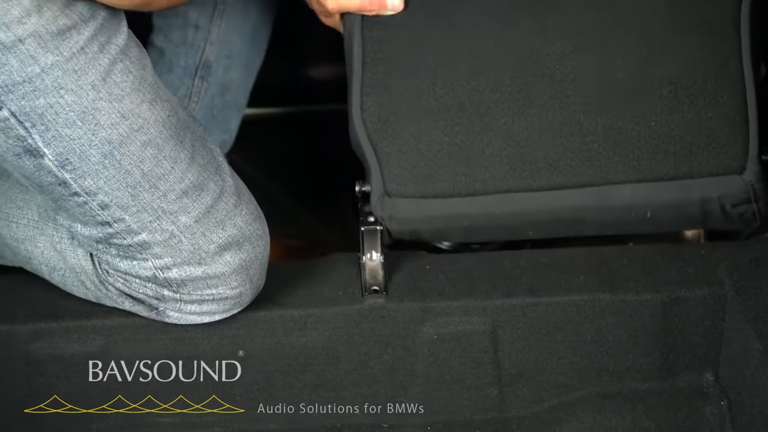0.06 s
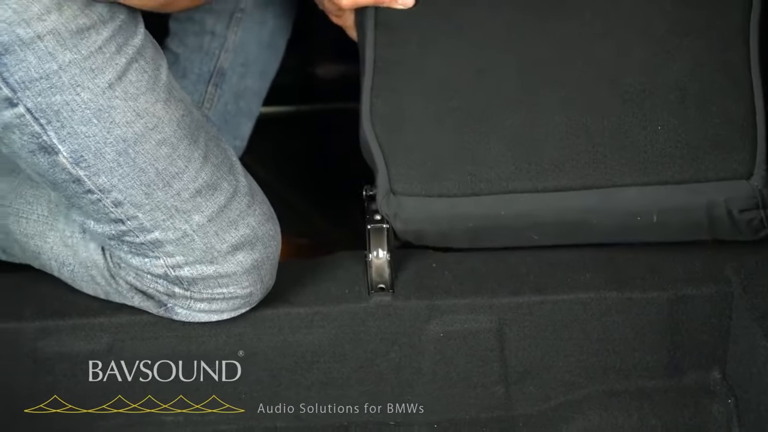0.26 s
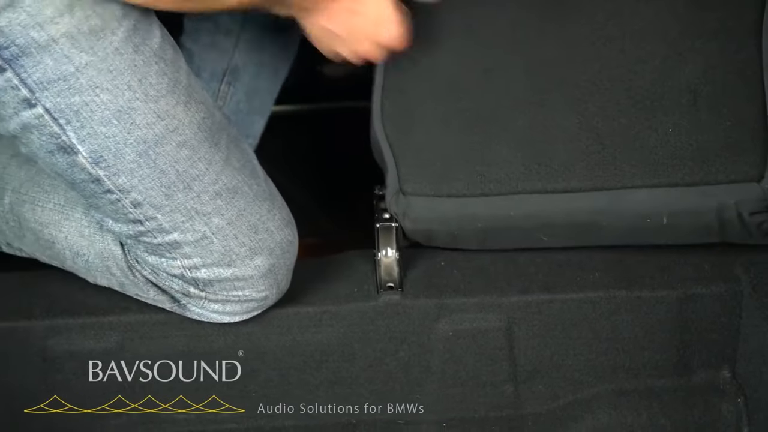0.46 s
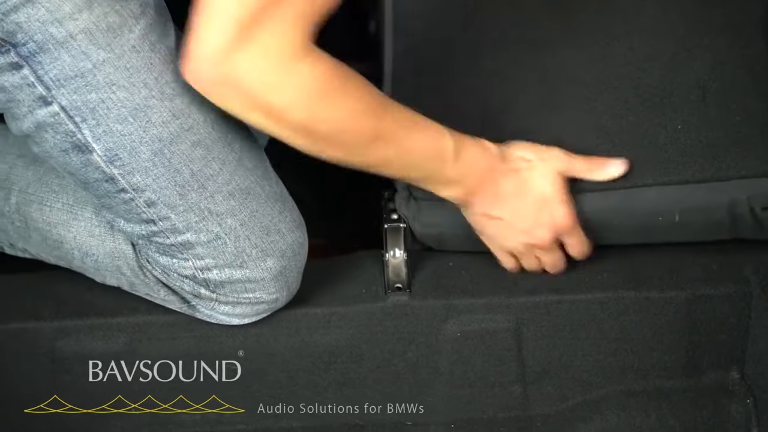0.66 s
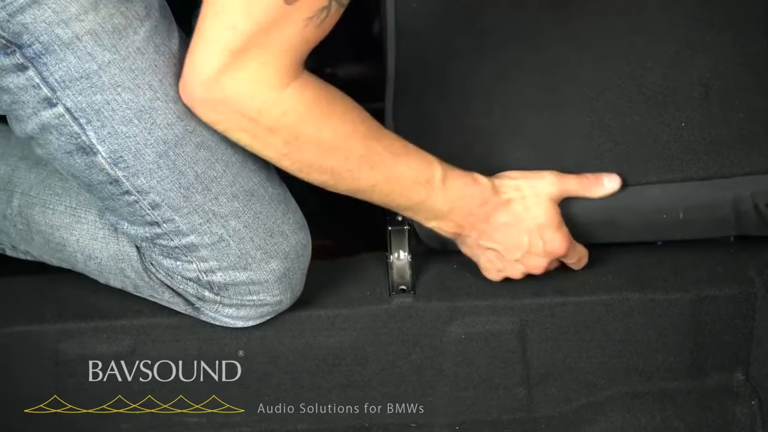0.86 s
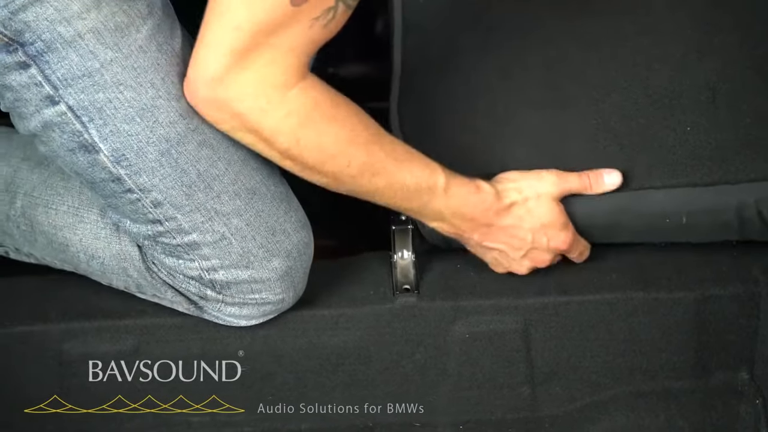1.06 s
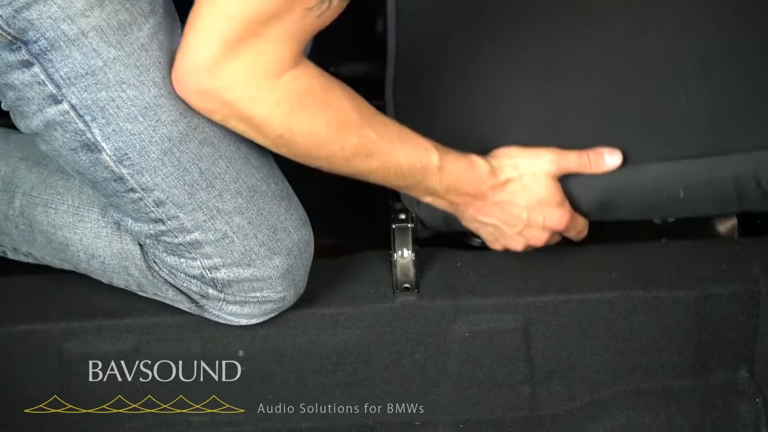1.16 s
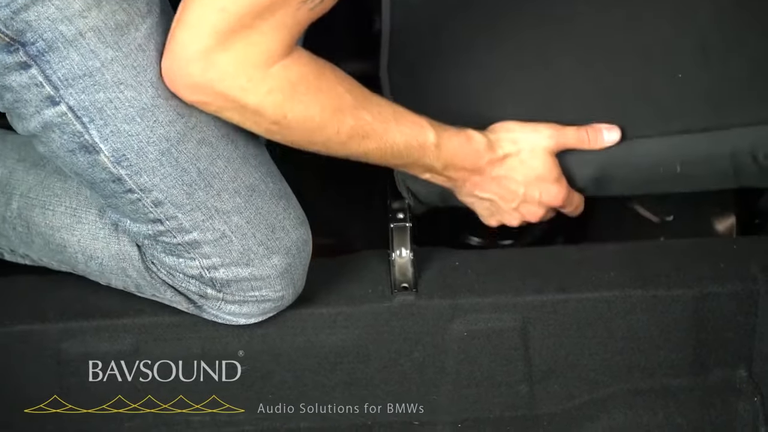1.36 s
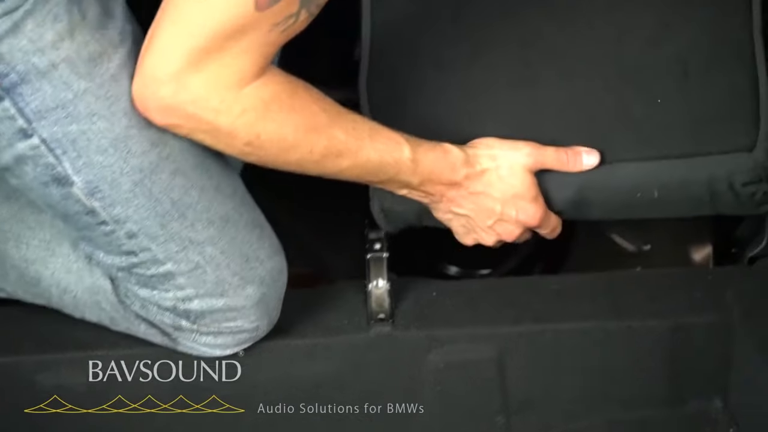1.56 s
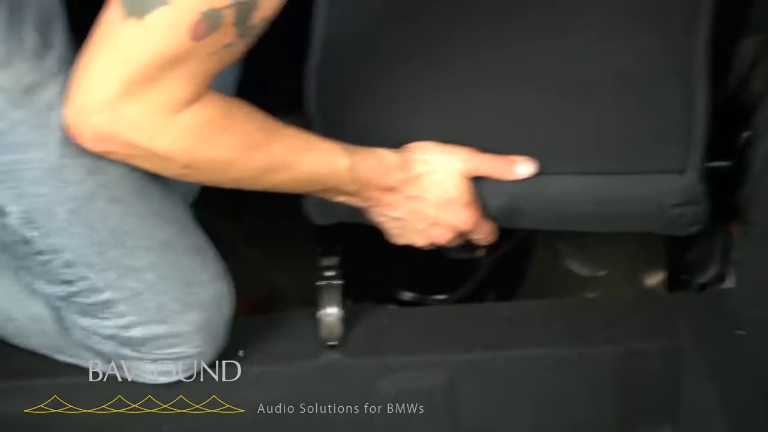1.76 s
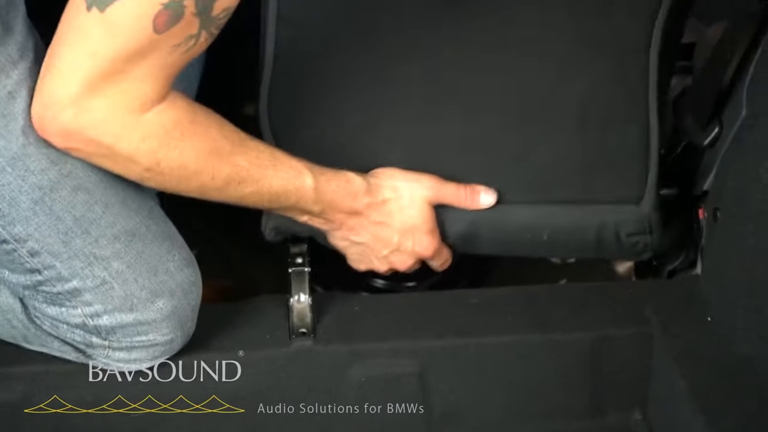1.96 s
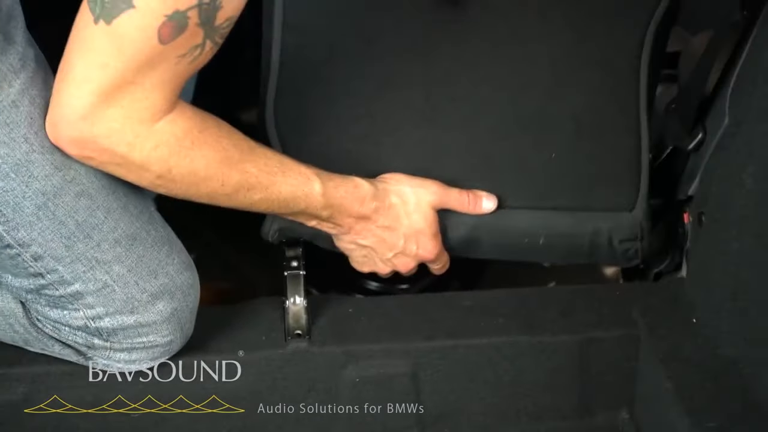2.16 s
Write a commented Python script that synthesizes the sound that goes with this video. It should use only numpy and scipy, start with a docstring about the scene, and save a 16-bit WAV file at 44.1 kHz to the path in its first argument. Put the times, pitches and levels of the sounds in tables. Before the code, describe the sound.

A car seatback clunks against steel brackets, close by in a small, dry cabin. A hand then pats and brushes across the fabric, and the seat gives a few soft knocks amid light cloth rustling.

```python
"""Seatback in a car cabin

A padded rear seatback is worked onto its steel brackets inside a small, acoustically dead cabin.
It lands with a double clunk and a metal click, and the impact sets the floor booming.
A hand slides over the upholstery and grips it, friction makes the cloth hiss,
and the damped modes of the frame knock dully as it is shifted."""
import sys
import numpy as np
from scipy import signal
from scipy.fft import rfft, irfft
from scipy.io import wavfile

SR = 44100
rng = np.random.default_rng(int(sys.argv[2]) if len(sys.argv) > 2 else 0)


def put_to_file(sound):
    """Save the sound as 16-bit audio at rate SR, in the file named by the first command-line argument."""
    columns = np.atleast_2d(sound).T  # one column per channel
    safe = np.clip(columns, -1, 1)
    whole_steps = np.round(safe * 32767)
    wavfile.write(sys.argv[1], SR, whole_steps.astype(np.int16))


N = 97020

# Envelopes of the continuous sources (time [s], level [dB])
RUMBLE_ENVELOPE = [(0, -61.5), (.08, -63), (.13, -55), (.21, -53), (.44, -48), (.55, -58), (.65, -46),
                   (.7, -61), (.84, -52), (1.0, -60.5), (1.12, -63), (1.33, -55.5), (1.52, -60),
                   (1.58, -53.5), (1.73, -60.5), (1.95, -57.5), (2.06, -50), (2.2, -64)]  # weight shifting on the floor
DRAG_ENVELOPE = [(0, -72), (.07, -55.5), (.2, -64.5), (.36, -70), (.43, -66), (.67, -102), (.71, -52),
                 (.97, -61.5), (1.17, -57), (1.35, -70), (1.9, -75), (1.97, -65), (2.08, -67.5),
                 (2.2, -70.5)]  # seatback dragging over carpet
SHUFFLE_ENVELOPE = [(0, -64), (.1, -62), (.2, -52.5), (.32, -45), (.42, -62.5), (.56, -57.5), (.62, -58),
                    (.67, -64), (.8, -52.5), (1.0, -57.5), (1.17, -61), (1.22, -63), (1.27, -57.5),
                    (1.34, -57.5), (1.44, -60.5), (1.48, -56), (1.59, -62.5), (1.69, -56.5), (1.87, -65.5),
                    (1.93, -58), (1.97, -51.5), (2.08, -60.5), (2.2, -62)]  # clothes and padding
HISS_ENVELOPE = [(0, -82), (.16, -84.5), (.2, -74.5), (.33, -71.5), (.44, -80.5), (.5, -75.5),
                 (.545, -68.5), (.58, -73), (.625, -63.5), (.64, -77.5), (.69, -76.5), (.73, -72),
                 (.81, -75.5), (.84, -64), (.9, -71), (.97, -68), (1.19, -67), (1.22, -75.5), (1.27, -71),
                 (1.5, -77), (1.63, -83), (1.68, -79.5), (1.85, -84.5), (1.95, -73), (2.03, -81),
                 (2.2, -86)]  # cloth on cloth
SLIDE_ENVELOPE = [(0, -110), (.68, -80), (.73, -57), (.78, -44.5), (.82, -42.5), (.85, -42), (.88, -46),
                  (.95, -50.5), (1.0, -55.5), (1.08, -72.5), (1.25, -100)]  # cushion and hand on upholstery

# Spectra of the noise sources (frequency [Hz], relative level [dB])
RUMBLE_SPECTRUM = [(15, -25.5), (30, -22.5), (45, 3), (60, 1.5), (100, -1), (130, -6.5), (165, -8),
                   (260, -16), (600, -37.5), (2000, -80.5)]
DRAG_SPECTRUM = [(150, -41), (500, -14.5), (720, 1.5), (880, -0.5), (1100, -16), (1500, -23.5),
                 (4000, -45.5)]
SHUFFLE_SPECTRUM = [(60, -4.5), (200, 4.5), (400, 5), (800, -2), (1200, -6.5), (1700, -16), (2500, -20),
                    (4000, -30), (8000, -54), (16000, -40)]
HISS_SPECTRUM = [(300, -16), (1500, 4.5), (3000, 2), (4500, 3), (6500, -1.5), (7800, -4), (10000, -7),
                 (16000, -22.5)]
FIZZ_SPECTRUM = [(4000, -40), (7000, -9), (9000, -7.5), (12500, -2.5), (14400, -5.5), (16000, -4.5)]  # finest part of the hiss
SLIDE_SPECTRUM = [(40, -31), (100, -23), (300, -29), (450, -33), (620, 1.5), (900, -2.5), (1600, -5),
                  (2000, -13.5), (2400, -13.5), (3000, -17.5), (3300, -28.5), (8000, -33)]
BRUSH_SPECTRUM = [(300, -10), (1200, 7.5), (2000, 1), (2800, -6.5), (4200, -10), (6000, -24), (16000, -68)]
CLICK_SPECTRUM = [(80, -39.5), (600, -5.5), (1600, 14.5), (2700, -7.5), (5400, 3.5), (7000, -6),
                  (8200, -9.5), (11000, -12), (13500, -5), (16000, -16)]
THUD_SPECTRUM = [(60, -46), (200, 6.5), (700, -15.5), (1500, 6), (2800, -3.5), (4000, 17), (16000, -40)]  # dense, quickly damped part of a blow

# Panel resonances excited by the slide (frequency [Hz], width [Hz], boost [dB])
PANEL_RESONANCES = [(567, 90, 4.3), (744, 12, 6.5), (789, 27, 6.5), (884, 36, 4.6), (1116, 29, 12),
                    (1322, 25, 5.4), (1455, 41, 7.9), (2390, 50, 3.6), (2485, 22, 7.9), (2900, 33, 4)]
# Normal modes (frequency [Hz], relative level [dB], T60 [s])
CUSHION_MODES = [(108, 5.5, 0.057), (165, 10, 0.071), (200.5, 6, 0.055), (236, 6.5, 0.044), (277, 2, 0.089),
                 (331, -10.5, 0.15)]  # foam-filled cushion
FLOOR_MODES = [(52.8, -13, .4), (73.4, 0.5, 0.3), (98, 2, 0.4), (158.6, -3.5, 0.14), (179.6, -14, 0.14)]  # floor and cabin air
FRAME_MODES = [(180.3, -15.5, 0.14), (248, -12.5, 0.18), (320, 1.5, 0.097), (380.3, 0.5, 0.12),
               (527, 4.5, 0.053), (616.5, 2.5, 0.067), (751, 1.5, 0.056), (832.6, 2, 0.048),
               (950, -0.5, 0.043), (1188, -3, 0.045), (1487, -8, 0.054), (1663, -9, 0.052),
               (2125, -8, 0.03), (2780, -7, 0.032)]  # padded frame, before each blow's pitch and T60 ratios
# Reflections from windows and roof (delay [s], level [dB])
REFLECTIONS = [(.0053, -9), (0.0109, -15.5)]

# Quick brushes against the fabric (time [s], duration [s], level [dB])
BRUSH_STROKES = [(0.288, 0.15, -61.5), (0.41, 0.17, -64.5), (0.553, 0.097, -57), (1.02, 0.19, -65.5),
                 (1.211, 0.093, -62.5), (1.916, 0.068, -81)]
# The hand bumping and gripping the cushion (time [s], level [dB])
HAND_BUMPS = [(0.731, -49.5), (.8190, -39), (0.8316, -41), (0.8373, -35), (.9390, -43)]
# Steel touching steel (time [s], level [dB], tilt [dB/octave])
BRACKET_CONTACTS = [(0.092, -60.5, 1), (.2262, -72, 8), (0.2705, -22, -1), (.2735, -27.5, -8.5),
                    (0.275, -30, -1.5), (1.3678, -55, 3.5), (1.5215, -55, 10), (2.0105, -51, -6),
                    (2.0322, -52, -5)]
# Blows on the frame
# (time [s], relative level [dB], cutoff [Hz], boom offset [dB], pitch [ratio], T60 [ratio])
FRAME_BLOWS = [(0.2269, 7, 1480, -17.5, 0.81, 0.57), (0.2334, -2.5, 351, 4.5, .75, 0.2),
               (.2735, 9, 2040, -1, 1, 0.5), (0.2787, 9.5, 700, -4.5, 0.938, 0.49),
               (0.7042, -29.5, 1400, -27, 1.3, 0.92), (.7290, 0.5, 1080, -8.5, 1.07, 0.28),
               (.7455, -6.5, 1220, -2, 1.12, 0.43), (1.1910, -6, 1250, -16.5, 1.3, 0.29),
               (1.3679, -8, 1210, -37.5, 1.02, 0.44), (1.8031, -2.5, 980, -25.5, 1.01, 0.41),
               (2.0317, -4, 1380, -17, 0.87, 0.67), (2.0555, -16.5, 1080, -7, 0.78, 1.27)]


def amp(db):
    """Amplitude grows tenfold every 20 dB."""
    return 10 ** (np.asarray(db) / 20)


def unit(x):
    """Normalisation to an rms of 1."""
    return x / np.sqrt(np.mean(x ** 2) + 1e-20)


def add(mix, start_s, sound):
    """Superposition: a sound adds to the mix from its start time."""
    part = mix[max(round(start_s * SR), 0):][:len(sound)]
    part += sound[:len(part)]


def envelope(points):
    """Gain at every sample, interpolated linearly in decibels."""
    return amp(np.interp(np.arange(N) / SR, *np.transpose(points)))


def colour(x, spectrum, resonances=()):
    """Spectral shaping by a broad curve and resonance peaks, at rms 1."""
    hz = np.fft.rfftfreq(len(x), 1 / SR)
    points_hz, points_db = np.transpose(spectrum)
    gain_db = np.interp(np.log(hz + 1), np.log(points_hz), points_db)
    for centre, width, boost in resonances:
        gain_db += boost / (1 + (2 * (hz - centre) / width) ** 2)
    return unit(irfft(rfft(x) * amp(gain_db), len(x)))


def rise(t, tau):
    """Exponential build-up with time constant tau."""
    return 1 - np.exp(-t / tau)


def decay(t, t60):
    """Exponential damping: 60 dB in t60 seconds."""
    return np.exp(-np.log(1000) * t / t60)


def modes(t, table, pitch=1, t60_ratio=1):
    """Damped modes build up within part of a cycle, so treble comes before bass."""
    build_cycles = 0.74
    return sum(amp(db) * rise(t, build_cycles / hz) * decay(t, t60 * t60_ratio)
               * np.sin(2 * np.pi * hz * pitch * t) for hz, db, t60 in table)


def friction(grain_db, clump_db, clump_hz):
    """Stick-slip friction: countless tiny slips of uneven size come in clumps."""
    slips, sizes, slow = rng.standard_normal((3, N))
    lowpass = 1 / (1 + (np.fft.rfftfreq(N, 1 / SR) / clump_hz) ** 4)
    clumps = unit(irfft(rfft(slow) * lowpass, N))
    return unit(slips * amp(grain_db * sizes + clump_db * clumps))


def cabin(x):
    """Reverberation in a small, absorbent space: close reflections and a short diffuse tail."""
    t = np.arange(SR // 3) / SR
    tail = rng.standard_normal(len(t)) * decay(t, t60=0.075) * np.minimum(t / 0.0033, 1)
    response = amp(-6) * tail / np.linalg.norm(tail)
    response[0] += 1  # direct sound
    for delay, db in REFLECTIONS:
        add(response, delay, amp([db]))
    return signal.fftconvolve(x, response)[:N]


def body_rumble():
    """Forced vibration: shifting weight drives the car body at low frequencies."""
    return envelope(RUMBLE_ENVELOPE) * colour(rng.standard_normal(N), RUMBLE_SPECTRUM)


def fabric_rubbing():
    """Friction is a broadband source, filtered by the panel, carpet, padding and cloth."""
    hand = friction(grain_db=5, clump_db=1.5, clump_hz=92)
    slide = envelope(SLIDE_ENVELOPE) * colour(hand, SLIDE_SPECTRUM, PANEL_RESONANCES)
    carpet = friction(grain_db=7.5, clump_db=0, clump_hz=73.4)
    drag = envelope(DRAG_ENVELOPE) * colour(carpet, DRAG_SPECTRUM)
    padding = friction(grain_db=0.5, clump_db=2.55, clump_hz=48)
    shuffle = envelope(SHUFFLE_ENVELOPE) * colour(padding, SHUFFLE_SPECTRUM)
    cloth = friction(grain_db=2.5, clump_db=1, clump_hz=120)
    hiss_gain = envelope(HISS_ENVELOPE)
    hiss = hiss_gain * colour(cloth, HISS_SPECTRUM)
    # Power law: the fizz grows faster with rubbing speed than the hiss does.
    fizz = amp(-69) * (hiss_gain / amp(-68.5)) ** 1.39 * colour(cloth, FIZZ_SPECTRUM)
    return slide + drag + shuffle + hiss + fizz


def cloth_brushes():
    """Friction noise swells through each short stroke and stops as the cloth lets go."""
    gain = np.zeros(N)
    for start, duration, db in BRUSH_STROKES:
        progress = np.arange(0, duration, 1 / SR) / duration
        add(gain, start, amp(db) * np.sin(np.pi * progress ** 1.38))
    return gain * colour(friction(grain_db=4.5, clump_db=2.5, clump_hz=150), BRUSH_SPECTRUM)


def cushion_bumps():
    """Heavy damping in the foam turns each touch of the hand into a soft, low thump."""
    t, out = np.arange(SR // 4) / SR, np.zeros(N)
    for start, db in HAND_BUMPS:
        add(out, start, amp(db) * modes(t, CUSHION_MODES))
    return out


def bracket_clicks():
    """Hard contact is brief, hence broadband: steel ticks with a faint tail."""
    t, out = np.arange(SR // 4) / SR, np.zeros(N)
    gain = rise(t, tau=0.0004) * (decay(t, t60=0.012) + amp(-26) * decay(t, t60=0.18))
    for start, db, tilt in BRACKET_CONTACTS:
        spectrum = [(hz, level + tilt * np.log2(hz)) for hz, level in CLICK_SPECTRUM]
        add(out, start, amp(db) * gain * colour(rng.standard_normal(len(t)), spectrum))
    return out


def floor_booms():
    """Structural coupling: blows on the frame excite floor modes, slower to build and to die."""
    t, out = np.arange(SR // 2) / SR, np.zeros(N)
    boom = amp(-30.5) * modes(t, FLOOR_MODES) * rise(t, tau=0.0033)
    for start, db, _, boom_db, _, _ in FRAME_BLOWS:
        add(out, start, amp(db + boom_db) * boom)
    return out


def frame_knocks():
    """Impacts excite the frame's modes; the grip shifts and damps them, soft contact cuts the treble."""
    t, out = np.arange(SR // 2) / SR, np.zeros(N)
    thud_gain = amp(-43) * rise(t, tau=0.000602) * decay(t, t60=0.094)
    for start, db, cutoff_hz, _, pitch, t60_ratio in FRAME_BLOWS:
        thud = thud_gain * colour(rng.standard_normal(len(t)), THUD_SPECTRUM)
        ring = amp(-30.5) * modes(t, FRAME_MODES, pitch, t60_ratio)
        soft_contact = signal.butter(3, cutoff_hz, fs=SR, output="sos")
        add(out, start, amp(db) * signal.sosfilt(soft_contact, thud - ring))
    return out


def scene():
    """Superposition of all sources at one nearby point; only the knocks reverberate."""
    impacts = cabin(frame_knocks()) + floor_booms() + cushion_bumps() + bracket_clicks()
    return (impacts + fabric_rubbing() + cloth_brushes() + body_rumble())[None]


def record(dry):
    """Band limiting attenuates the deepest infrasound and the highest treble."""
    low_hz, high_hz = 12.7, 15850
    highpass = signal.butter(2, low_hz, "highpass", fs=SR, output="sos")
    lowpass = signal.firwin(511, high_hz, window=("kaiser", 9), fs=SR)
    return signal.oaconvolve(signal.sosfilt(highpass, dry), lowpass[None], "same")


dry = scene()
out = record(dry)
put_to_file(out)
```